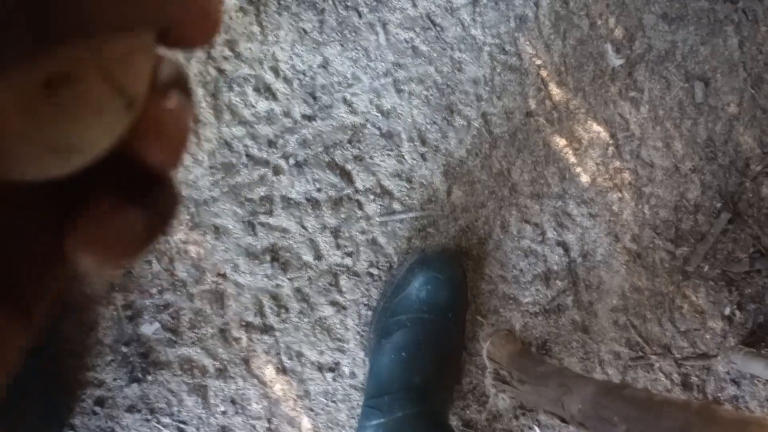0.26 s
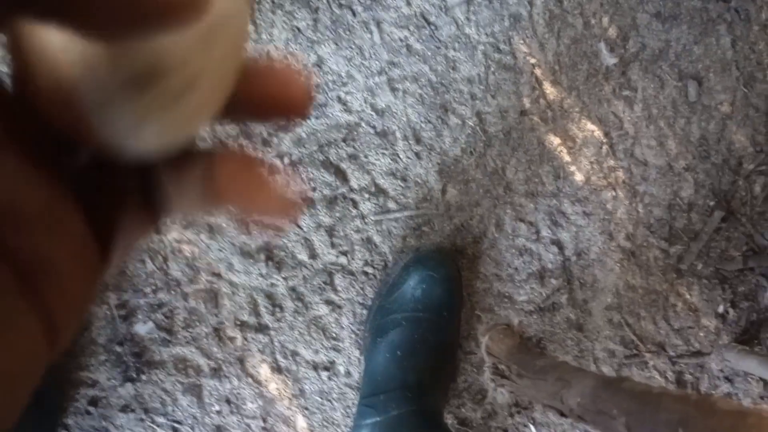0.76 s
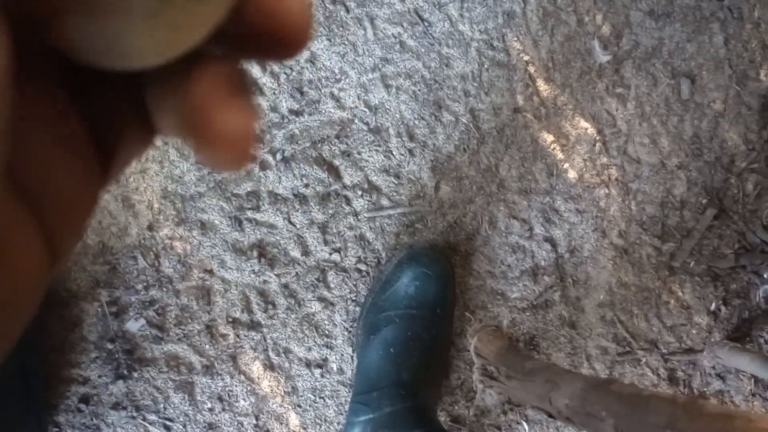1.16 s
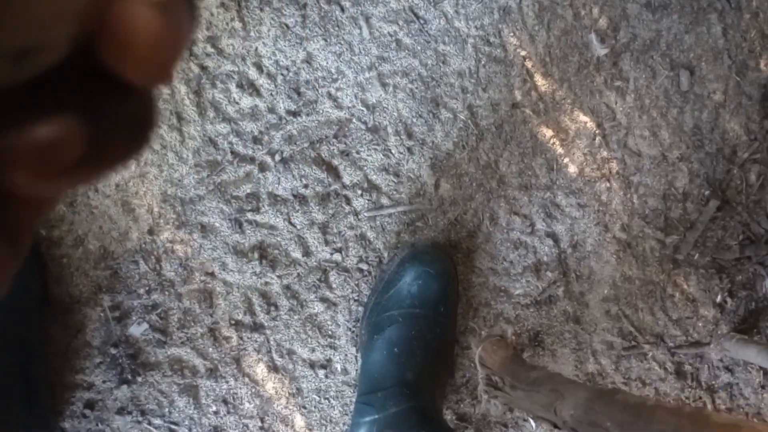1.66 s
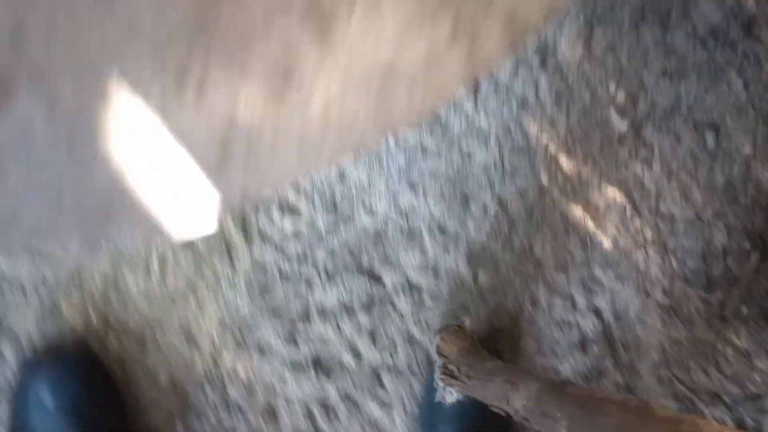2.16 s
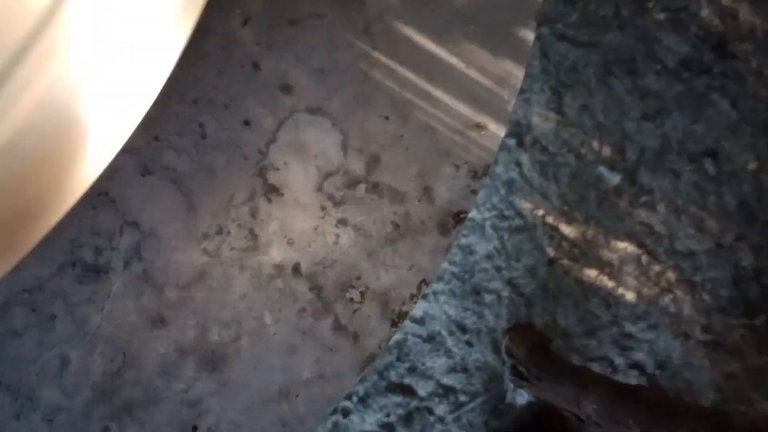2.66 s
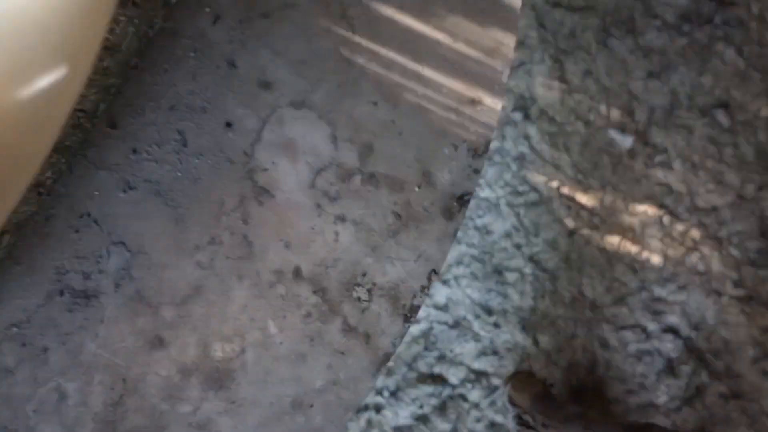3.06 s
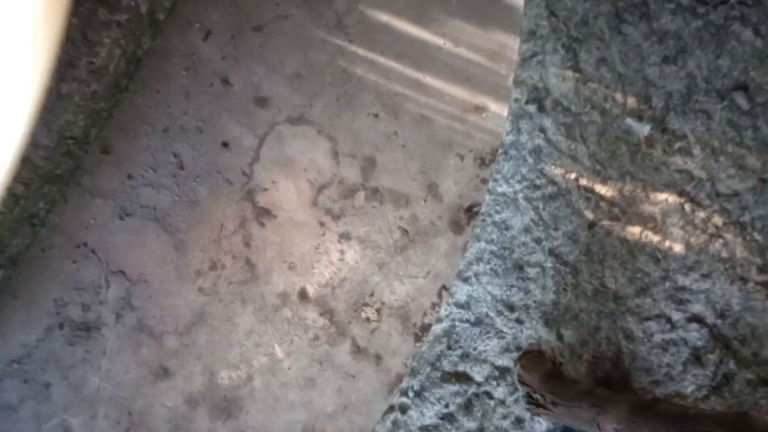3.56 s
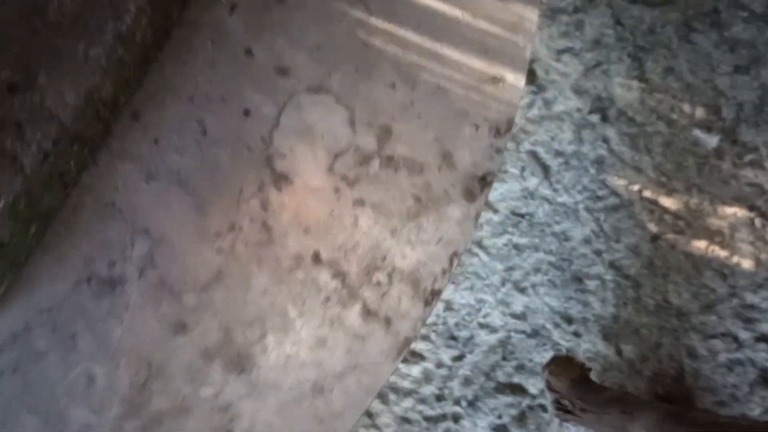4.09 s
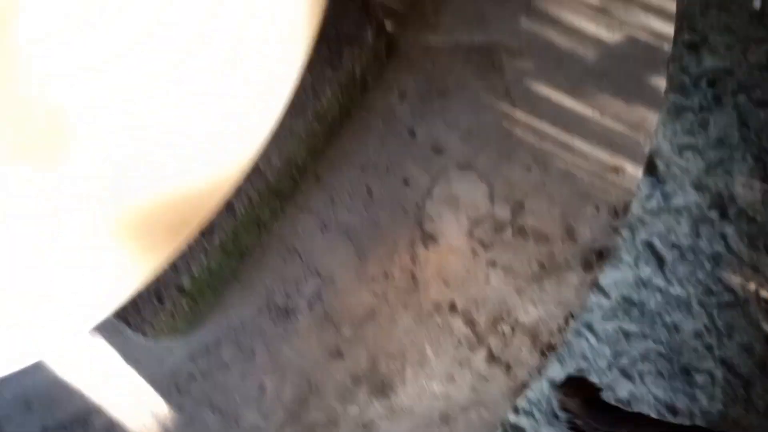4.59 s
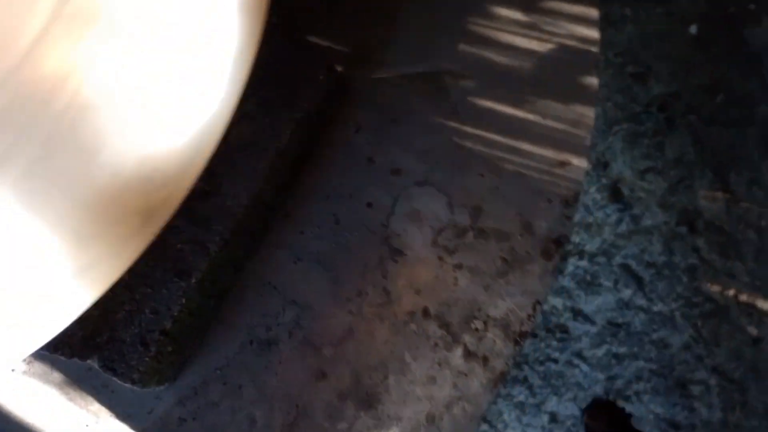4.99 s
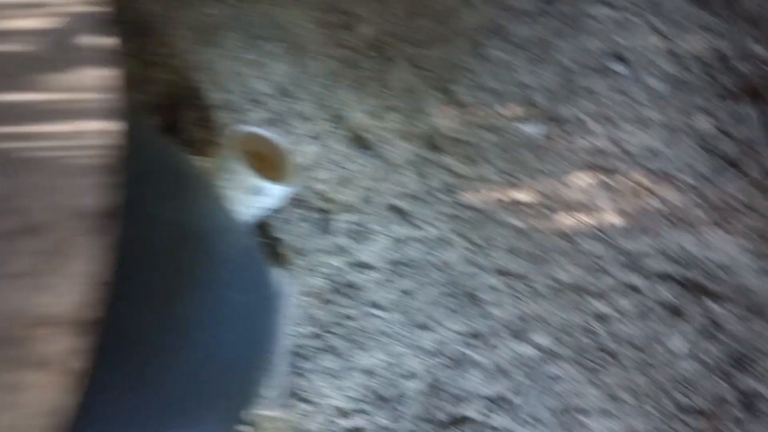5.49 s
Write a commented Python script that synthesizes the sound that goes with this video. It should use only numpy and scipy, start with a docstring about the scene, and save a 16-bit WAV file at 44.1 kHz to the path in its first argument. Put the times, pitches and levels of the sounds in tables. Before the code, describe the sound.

Close stereo phone capture with short echoes off shed walls. It starts almost silent, with soft whistles and distant clipped clucks. Midway a turkey gobbles once, loud and hoarse, its yelps tumbling rapidly over a low chest drumming. Straight afterwards guinea fowl answer in bright, nasal rasping notes, with a reedy churr and a purring rattle; fingers bump and rub the case, and a last harsh note is cut off.

```python
"""Poultry shed: a turkey gobbles once, close to a hand-held phone.
Turkey: yelps and cries of strong low harmonics, hoarse overtones, a drumming chest.
Guinea fowl: pulses and puffs through throat resonances, far then near; churrs, rattles, a squeal.
Hen: falling near-sine whistles. Hand: damped knocks, rubs and a cloth brush in shaped noise.
Yard: steady coloured noise. The walls return a short echo of all the birds."""
import sys
import numpy as np
from scipy import signal
from scipy.fft import rfft, irfft, next_fast_len
from scipy.io import wavfile

SR = 44100
rng = np.random.default_rng(int(sys.argv[2]) if len(sys.argv) > 2 else 0)


def to_wav(sig):
    """Store sig (one row per channel, or 1-D mono) as 16-bit WAV at the path in sys.argv[1].

    Samples outside -1..1 are clipped; the rate is SR.
    """
    pcm = np.clip(np.atleast_2d(sig), -1, 1) * 32767
    pcm = np.round(pcm).astype(np.int16)
    wavfile.write(sys.argv[1], SR, pcm.T)  # frames by channels


N = 253134

# gobble syllables: (start [s], hold [s], first harmonic [dB], second harmonic [dB], overtones [dB],
# start pitch [Hz], target pitch [Hz])
GOBBLE = [(2.708, 0.017, -33, -30.5, -31.5, 718, 728), (2.759, 0.02, -41, -42, -27, 742, 760),
          (2.921, 0.021, -51.5, -32, -31, 640, 596), (2.968, 0.0099, -26, -23, -24, 618, 669.4),
          (3.048, 0.026, -28.5, -33, -31, 609, 690.5), (3.119, 0.018, -34.5, -28.5, -29.5, 643, 690),
          (3.162, 0.012, -39, -37, -25, 697.5, 717), (3.172, 0.012, -31, -30.5, -33, 719, 628),
          (3.223, 0.032, -29.5, -32, -28.5, 599.6, 691), (3.277, 0.014, -49.5, -42, -26.5, 695.5, 723),
          (3.305, 0.0022, -45.5, -29, -32, 606, 589), (3.387, 0.036, -30, -33.5, -27, 713, 657)]
# two long opening cries: (time [s], pitch [Hz], first, second, third harmonic [dB], overtones [dB])
CRIES = [
    [(2.546, 699, -35.5, -42.5, -44.5, -35), (2.56, 617, -40, -16, -14, -45),
     (2.574, 708, -25, -14, -23.5, -29), (2.588, 700.5, -30, -14, -18.5, -33.5),
     (2.6, 591.4, -42, -21, -30, -32), (2.62, 655, -28.5, -13, -22.5, -35),
     (2.632, 737, -27, -16, -27, -29.5), (2.646, 800.4, -27, -19.5, -33, -23.5),
     (2.662, 696.5, -23.5, -23, -33, -19.5), (2.678, 777.4, -12, -41.5, -37, -36),
     (2.705, 728, -40.5, -40.5, -46.5, -41)],
    [(2.774, 630.4, -45.5, -35.5, -46, -30.5), (2.786, 651, -22, -14.5, -36.5, -33),
     (2.796, 604, -24, -27, -38, -32.5), (2.816, 643, -22, -21.5, -43, -34.5),
     (2.834, 723.5, -14.5, -28.5, -24, -20.5), (2.85, 793, -26, -20.5, -28, -25.5),
     (2.87, 768, -23, -31.5, -35.5, -27), (2.888, 672, -29.5, -28, -41, -37.5),
     (2.91, 666, -43, -40.5, -42.5, -39)],
]
# overtone envelope of the turkey: (frequency [Hz], relative level [dB])
BEAK = [(1800, 0), (2200, -4), (3000, -2), (4000, -5.5), (5200, -11.5), (7000, -21.5), (10000, -21.5),
        (15000, -35)]
# chest drumming under the gobble: (time [s], level [dB])
DRUM = [(2.53, -58.5), (2.596, -49.5), (2.638, -75), (2.774, -45.5), (2.902, -60.5), (2.936, -40.5),
        (2.988, -47.5), (3.454, -46.5), (3.53, -85.5)]
# chatter notes: (start [s], peak [dB], rise [s], hold [s], mouth opening [0-1])
CHATTER = [(.004, -59, 0.018, 0.063, 0.73), (0.444, -48, 0.0057, 0.013, 0.12),
           (0.72, -58, 0.028, 0.034, 0.27), (0.964, -57, 0.035, 0.049, 0.23),
           (1.253, -48.5, 0.021, 0.042, 0), (1.394, -53.5, 0.046, 0.031, 0.03),
           (1.746, -48, 0.031, 0.022, 0.76), (1.85, -41, 0.018, 0.007, 0.73),
           (1.956, -46, 0.018, 0.016, 0.66), (2.057, -45.5, 0.018, 0.014, 0.61),
           (2.161, -40, 0.012, 0.018, 0.5), (2.266, -42, 0.021, 0.015, 0.53),
           (2.36, -41.5, 0.017, 0.0047, 0.66), (2.443, -46, 0.033, 0.013, 0.63),
           (3.475, -33, 0.024, 0.0028, 0.93), (3.573, -33.5, 0.014, 0.024, 0.83),
           (3.679, -32.5, 0.0086, 0.027, 0.88), (3.795, -30, 0.032, 0.0056, 0.8),
           (3.964, -33, 0.029, 0.043, 0.87), (4.103, -26.5, 0.024, 0.038, 0.87),
           (4.224, -27, 0.015, 0.024, 0.85), (4.801, -29, 0.025, 0.026, 0.89),
           (4.939, -28, 0.024, 0.02, 0.93), (5.187, -28, 0.022, 0.045, 0.81),
           (5.584, -32, 0.034, 0.097, 0.84)]
# nominal throat resonances of the fowl: (centre [Hz], width [Hz], relative level [dB])
THROAT = [(963, 57, -7), (1424, 40, 8.5), (1828, 206, 1), (2259, 81, 6), (2766, 130, 4.5), (3372, 120, 6),
          (3980, 157, 7.5), (4357, 305, 2), (5350, 330, -9.5)]
# hiss spectrum of the fowl: (frequency [Hz], relative level [dB])
HISS = [(2940, -27), (5000, -0.5), (5600, 1.5), (7350, -7), (12600, -28.5), (15600, -84)]
# balance of the chatter as the phone turns: (time [s], left-right [dB])
BEARING = [(0, 0.5), (1.3, 3), (1.9, -8), (2.4, 0.5), (3.5, 0.5), (5.74, 0.5)]
# flock murmuring farther off: (time [s], level [dB])
FLOCK = [(1.4, -99), (2.4, -62), (3.5, -47.5), (3.93, -53.5), (4.8, -63.5), (5.1, -64), (5.5, -74.5),
         (5.74, -77.5)]
# throbbing rattles, one far and one near: (time [s], level [dB])
RATTLE = [
    [(1.45, -75), (1.7, -59.5), (1.76, -77)],
    [(4.17, -33), (4.45, -30), (4.66, -29), (4.73, -36), (4.79, -66)],
]
# rattle resonances: (centre [Hz], width [Hz], start level [dB], end level [dB], lag [throbs])
RATTLE_THROAT = [(906, 44, -8.5, -24.5, 0.36), (1623, 380, 3, 1.5, 0.0063), (2220, 170, -10, -0.5, 0.23),
                 (3170, 71, 7.5, -8, 0.028), (3630, 600, 14.5, -2.5, 0.043), (4540, 650, -6, -3, 0.29)]
# low voice of the near bird: (start [s], length [s], mid level [dB])
HUM = [(4.005, .05, -57), (4.12, .48, -52), (4.59, .16, -56), (4.82, .08, -57), (4.95, .1, -53),
       (5.205, .05, -55), (5.62, .2, -56)]
# reedy churrs of a second bird: (start [s], length [s], start pitch [Hz], end pitch [Hz],
# mid level [dB], overtones [dB], beading [0-1])
CHURR = [(0.023, 0.1, 2120, 2025, -55.5, -31, 1), (0.44, 0.054, 1390, 1270, -72, -16, 0.6),
         (1.012, 0.033, 1340, 1276, -65.5, -8, 0.6), (1.425, 0.13, 1338, 1304, -66.5, -3.5, 0.87),
         (1.538, 0.22, 1340, 1304, -61.5, -5, 1), (1.76, 0.28, 1292, 1350, -64.5, -3.5, 0.86),
         (3.566, 0.41, 1400, 1390, -46.5, -14, 0.1), (4.035, 0.079, 1388, 1312, -41, -2, 1),
         (4.314, 0.1, 1333, 1478, -33, -18.5, 0.5), (4.41, 0.32, 1424, 1486, -42, -5, 1),
         (5.068, 0.083, 1570, 1610, -55.5, -24, 0.55), (5.575, 0.12, 1348, 1395, -37, -22, 0.3)]
# hoarse squeal between the near notes: (time [s], centre [Hz], level [dB])
SQUEAL = [(3.52, 3650, -38.5), (3.6, 3323, -41.5), (3.78, 3167, -43.5), (3.88, 3425, -53),
          (3.97, 3273, -43), (4.0, 3400, -33)]
# falling whistles: (start [s], length [s], start pitch [Hz], end pitch [Hz], start level [dB])
WHISTLES = [(0, 0.49, 2260, 1538, -64), (0.569, 0.62, 2620, 1534, -62.5), (1.337, 0.3, 1880, 1260, -73.5)]
# ticks and bumps of the hand: (time [s], level [dB], centre [Hz], T60 [s])
TICKS = [(0.004, -66.5, 534, 0.49), (0.738, -58, 820, 0.098), (0.741, -64, 4860, 0.074),
         (2.844, -28, 287, 0.037), (3.018, -26.5, 366, 0.044), (3.892, -42.5, 285, 0.1),
         (4.496, -47, 536, 0.15), (5.313, -41, 328, 0.097), (5.344, -30, 318, 0.085),
         (5.368, -28.5, 353, 0.078), (5.427, -40, 114, 0.16), (5.43, -63, 1180, 0.096)]
# fingers rubbing along the case: (time [s], level [dB])
RUB = [
    [(2.25, -73.5), (2.52, -64.5), (2.53, -58)],
    [(5.2, -62), (5.31, -40.5), (5.375, -35.5), (5.405, -54.5), (5.52, -72.5)],
]
# rub spectrum: (frequency [Hz], relative level [dB])
RUB_TONE = [(30, -17.5), (140, -8.5), (248, -19.5), (327, -4), (571, -17), (1500, -18), (1950, -15),
            (3300, -120)]
# cloth brushing the phone: (time [s], level [dB])
BRUSH = [(.385, -79.5), (.44, -65), (.49, -78)]
# background spectrum: (frequency [Hz], relative level [dB])
YARD = [(25, -13.5), (116, -6), (1030, -25.5), (1310, -26), (1670, -21), (2490, -22.5), (15600, -36.5)]
# body shading between the two microphones: (frequency [Hz], left-right [dB])
PORT_DB = [(100, -1), (300, 2), (1400, 0), (2100, -7), (2750, -2), (3600, -10.5), (5200, -1), (6900, 4),
           (9500, 2), (15000, -9)]
# phase between the two microphones: (frequency [Hz], left lead [rad])
PORT_LEAD = [(300, .2), (700, .3), (1380, 1.3), (1750, 2.2), (2100, 4.6), (3000, 6), (15000, 30)]

YELP_ATTACK_S, YELP_T60_S = 0.011, 0.092
GLIDE_SHARE = 0.6  # time constant of the glide, as a share of the hold
SAG_HZ_PER_S = 1500  # pitch fall in the release
TRADE_DB = 2.5  # through a syllable the second harmonic yields this much to the first
DRUM_HZ = 79
NOTE_T60_S = 0.14
SCOOP = 0.13  # throat resonances start this share low and rise as the mouth opens
BRIGHTEN = 0.22  # loudest part of a note's spectrum rises by this share and falls back
THROBS_PER_S = 40.8
PULSE_HZ = 307  # mean rate of the fowl's pulses and hum
HUM_ENDS_DB, CHURR_ENDS_DB = -5, -18
WHISTLE_FADE_DB, WHISTLE_BEND = -24, 0.55
RING_HZ, RING_WIDTH_HZ, RING_DB = 1735, 45, 11  # a whistle swells as it passes this resonance
BRUSH_HZ = 5900
YARD_DB = -80.5
ECHO_FOWL_DB, ECHO_TOM_DB, ECHO_RATTLE_DB, SHED_T60_S = 2.5, -3.5, -2, 0.11
EDGE_HZ = 15720


def amp(db):
    """Decibels to amplitude."""
    return 10 ** (np.asarray(db) / 20)


def evened(x):
    """Scale to rms 1."""
    return x / np.sqrt(np.mean(x ** 2) + 1e-20)


def read(points, hz):
    """Interpolate a spectrum curve over log frequency."""
    f, value = np.transpose(points)
    return np.interp(np.log(hz + 1), np.log(f + 1), value)


def unroll(rows):
    """Times, soft-ended window and every column of a curve, sample by sample."""
    s, *columns = np.transpose(rows)
    t = np.arange(s[0], s[-1] + 0.0039, 1 / SR)
    edge = signal.windows.tukey(len(t), min(1, 0.0048 * SR / len(t)))
    return t, edge, [np.interp(t, s, c) for c in columns]


def add(mix, start_s, sound):
    """Add a sound in place, cut off at the end of the mix."""
    part = mix[..., round(start_s * SR):][..., :sound.shape[-1]]
    part += sound[..., :part.shape[-1]]


def phase(hz):
    """Phase [rad] of a frequency curve."""
    return 2 * np.pi * np.cumsum(hz) / SR


def colour(x, points):
    """Filter by a spectrum curve."""
    gain = amp(read(points, np.fft.rfftfreq(x.shape[-1], 1 / SR)))
    return irfft(rfft(x) * gain, x.shape[-1])


def resonate(x, hz, width_hz):
    """One-pole resonance, fixed or following a curve, run at baseband."""
    r = np.exp(-np.pi * width_hz / SR)
    turn = np.exp(2j * np.pi * np.cumsum(hz * np.ones(x.shape[-1])) / SR)
    return 2 * (turn * signal.lfilter([1 - r], [1, -r], x / turn)).real


def throat(drive, hz, width_hz):
    """Two resonances in series, the second twice as wide."""
    return resonate(resonate(drive, hz, width_hz), hz, 2 * width_hz)


def wander(count, width_hz):
    """Smooth random curve of rms 1: noise through two low-passes."""
    noise = rng.standard_normal(count + 999)
    return evened(resonate(resonate(noise, 0, width_hz), 0, width_hz)[999:])


def swell(start_s, length_s, db, ends_db):
    """Times, progress 0-1 and gain of a call that swells to db in its middle."""
    t, edge, (done,) = unroll([(start_s, 0), (start_s + length_s, 1)])
    soft = np.clip(np.minimum(t - start_s, start_s + length_s - t) / 0.02, 0, 1)
    return t, done, edge * soft * amp(db + ends_db * (2 * done - 1) ** 2)


def turkey():
    """Abrupt yelps: two harmonics trade places as the beak flaps, hoarse overtones, chest drumming."""
    out = np.zeros(N)
    n = 5000
    t = np.arange(n) / SR
    for start, hold, first_db, second_db, over_db, start_hz, target_hz in GOBBLE:
        done = 1 - np.exp(-t / (GLIDE_SHARE * hold))
        after = np.maximum(t - YELP_ATTACK_S - hold, 0)
        hz = start_hz + (target_hz - start_hz) * done - SAG_HZ_PER_S * after
        trade_db = TRADE_DB * (done - 0.5)
        shape = np.minimum(t / YELP_ATTACK_S, 1) ** 2 * amp(-60 * after / YELP_T60_S)
        turn = phase(hz * (1 + 0.015 * wander(n, 70) + 0.011 * wander(n, 500)))
        first_shake = amp(3.5 * np.minimum(wander(n, 160), 1))
        second_shake = amp(6 * np.minimum(wander(n, 160), 1))
        crack_rad = 0.9 * wander(n, 130)  # second harmonic breaks up
        first = amp(first_db + trade_db) * first_shake * np.cos(turn)
        second = amp(second_db - trade_db) * second_shake * np.cos(2 * turn + crack_rad)
        overtones = amp(over_db) * hoarse(hz, turn, lowest=3)
        add(out, start, shape * (np.sqrt(2) * (first + second) + overtones))
    t, edge, (drum_db,) = unroll(DRUM)
    drum = evened(throat(rng.standard_normal(len(t)), DRUM_HZ, 23))
    add(out, t[0], edge * amp(drum_db) * drum)
    return out


def cries():
    """Bending cries; each low harmonic swells on its own as the beak flaps."""
    out = np.zeros(N)
    for rows in CRIES:
        t, edge, (hz, *low_db, over_db) = unroll(rows)
        n = len(t)
        turn = phase(hz * (1 + 0.01 * wander(n, 70) + 0.014 * wander(n, 500)))
        low = np.zeros(n)
        for k, db in enumerate(low_db, 1):
            shake_db = 1.5 * k * np.minimum(wander(n, 160), 0.3)
            crack_rad = 0.3 * (k - 1) * wander(n, 130)
            low += amp(db + shake_db) * np.cos(k * turn + crack_rad)
        add(out, t[0], edge * (np.sqrt(2) * low + amp(over_db) * hoarse(hz, turn, lowest=4)))
    return out


def hoarse(hz, turn, lowest):
    """Upper harmonics, each flickering in level, and breath puffed once a cycle."""
    n = len(hz)
    stack = sum(amp(read(BEAK, k * hz) + 4.8 * wander(n, 59)) * np.cos(k * turn)
                for k in range(lowest, 12))
    breath = rng.standard_normal(n) * (1.65 + np.cos(turn))
    puffs = colour(breath, [(1100, -27.0)] + BEAK)
    return 0.9 * evened(stack) + 0.42 * evened(puffs)


def rasp():
    """Uneven pulses with a puff of air after each, and the hiss that they carry."""
    cycles = np.cumsum(PULSE_HZ * (1 + 0.07 * wander(N, 150))) / SR
    pulses = evened(np.diff(np.floor(cycles), prepend=0) * amp(0.6 * rng.standard_normal(N)))
    air = evened(rng.standard_normal(N) * np.exp(-(cycles % 1) / 0.5))
    return 0.7 * pulses + 0.62 * air, evened(colour(air + 0.62 * pulses, HISS))


def chatter():
    """Notes start narrow near 2.2 kHz and spread as the mouth opens; the throat is set anew each time."""
    drive, hiss = rasp()
    out = np.zeros((2, N))
    chance = rng.standard_normal((len(CHATTER), len(THROAT), 2))
    for (onset, db, rise, hold, mouth), setting in zip(CHATTER, chance):
        pan_db = np.interp(onset, *np.transpose(BEARING))
        peak_s, start = onset + rise, round(onset * SR)
        stop = min(round((peak_s + hold + NOTE_T60_S) * SR), N)
        t = np.arange(start, stop) / SR - peak_s
        span = slice(start, start + len(t))
        release_db = -60 * np.maximum(t - hold, 0) / NOTE_T60_S
        shape_db = np.where(t < 0, -11 * (t / rise) ** 4, release_db)
        opening = np.clip(mouth, 0, 1)
        shut = 1 - opening * np.clip(1 + t / rise, 0, 1)
        late_db = 40 * np.clip(-t / rise - 0.25, 0, 1)  # outer resonances join late
        slide = 1 - SCOOP * np.clip(0.5 - t / rise, 0, 1.5) + 0.015 * wander(len(t), 30)
        bright_hz = 2150 * (1 + BRIGHTEN * np.exp(-(t / hold - 0.5) ** 2))
        slope_db = 50 * shut ** 1.6 + late_db  # per octave away from bright_hz
        voice, full = np.zeros(len(t)), np.zeros(len(t))
        for (hz, width_hz, mode_db), (level_chance, pitch_chance) in zip(THROAT, setting):
            mode_hz = hz * (1 + 0.025 * pitch_chance) * slide
            mode = throat(drive[span], mode_hz, (0.65 + 1.2 * opening) * width_hz)
            mode = amp(mode_db + 1.5 * level_chance) * mode
            full += mode
            voice += mode * amp(-slope_db * abs(np.log2(hz / bright_hz)))
        voice = voice / np.std(full) + amp(-6.0 - 50.0 * shut - late_db) * hiss[span]
        flicker_db = 1.9 * wander(len(t), 41.4)
        pan = amp([[pan_db / 2], [-pan_db / 2]])
        add(out, start / SR, amp(db + shape_db + flicker_db) * voice * pan)
    add_flock(out)
    return out


def add_flock(out):
    """Distant murmur: noise through widened throat resonances, independent in each channel."""
    t, edge, (db,) = unroll(FLOCK)
    air = rng.standard_normal((2, len(t)))
    murmur = sum(amp(mode_db) * throat(air, hz, 1.9 * width_hz) for hz, width_hz, mode_db in THROAT)
    add(out, t[0], edge * amp(db) * evened(murmur))


def rattler():
    """Throbbing rasp, its resonances peaking at different lags in each throb; separate low hums."""
    drive, hiss = rasp()
    out = np.zeros(N)
    for rows in RATTLE:
        t, edge, (db,) = unroll(rows)
        n = len(t)
        slip = 0.06 * wander(n, 15)  # throbs come a little unevenly
        blur = np.linspace(0.1, 0.55, n) ** 1.5 + 0.1  # and blur into one another

        def beat(lag):
            """Throb envelope, delayed by a share of a throb."""
            throbs = THROBS_PER_S * (t - 4.312) + slip - lag
            return ((1 + np.cos(2 * np.pi * throbs)) / 2 + blur) ** 1.8

        voice = np.zeros(n)
        for hz, width_hz, from_db, to_db, lag in RATTLE_THROAT:
            mode_db = np.linspace(from_db, to_db, n) + 1.5 * wander(n, 23)
            mode_hz = hz * (1 + width_hz / 8000 * wander(n, 8))
            voice += amp(mode_db) * beat(lag) * evened(throat(drive[:n], mode_hz, width_hz))
        breath = amp(-21) * (1 + beat(0.29)) / 2 * hiss[:n]
        add(out, t[0], edge * amp(db) * (evened(voice) + breath))
    for row in HUM:
        t, _, gain = swell(*row, HUM_ENDS_DB)
        turn = phase(PULSE_HZ * (1 + 0.036 * wander(len(t), 39)))
        tone = np.sqrt(2) * (np.cos(turn) + 0.068 * np.cos(2 * turn))
        add(out, t[0], gain * amp(2.4 * wander(len(t), 87)) * tone)
    return out


def churr():
    """Reed tone with two overtones, beaded about eighty times a second."""
    out = np.zeros(N)
    for start, length, start_hz, end_hz, db, over_db, beading in CHURR:
        t, done, gain = swell(start, length, db, CHURR_ENDS_DB)
        n = len(t)
        hz = start_hz + (end_hz - start_hz) * done
        turn = phase(hz * (1 + 0.011 * beading * wander(n, 150)))
        beat = 1 + np.clip(beading, 0, 1) * np.cos(phase(80 * (1 + 0.3 * wander(n, 25))))
        tone = np.cos(turn) + amp(over_db) * (np.cos(2 * turn) + 1.56 * np.cos(3 * turn))
        add(out, t[0], gain * np.sqrt(2) * amp(2.0 * wander(n, 33)) * tone * beat)
    return out


def squeal():
    """Narrow tone, wavering in pitch and level."""
    t, edge, (hz, db) = unroll(SQUEAL)
    turn = phase(hz * (1 + 0.014 * wander(len(t), 90)))
    out = np.zeros(N)
    add(out, t[0], edge * amp(db + 2.6 * wander(len(t), 85)) * np.cos(turn))
    return out


def hen():
    """Near-sine whistles, unsteady in pitch and level, with a faint overtone."""
    out = np.zeros(N)
    for start, length, start_hz, end_hz, start_db in WHISTLES:
        t, edge, (done,) = unroll([(start, 0), (start + length, 1)])
        hz = start_hz * (end_hz / start_hz) ** done ** WHISTLE_BEND
        turn = phase(hz * (1 + 0.009 * wander(len(t), 120)))
        tone = np.cos(turn) + 0.027 * np.cos(2 * turn)
        ring_db = RING_DB * np.exp(-((hz - RING_HZ) / RING_WIDTH_HZ) ** 2)
        db = start_db + WHISTLE_FADE_DB * done + ring_db + 2.5 * wander(len(t), 50)
        add(out, t[0], edge * np.sqrt(2) * amp(db) * tone)
    return out


def hand():
    """Damped knocks, lumpy low rubs and a cloth brush, partly or wholly unlike at the two microphones."""
    out, t = np.zeros((2, N)), np.arange(6000) / SR
    for start, db, hz, t60 in TICKS:
        air = rng.standard_normal((3, len(t)))
        knock = evened(throat(air[2] + 0.37 * air[:2], hz, 0.52 * hz))
        add(out, start, amp(db - 60 * t / t60) * knock * (1 - np.exp(-t / 0.0022)))
    for rows in RUB:
        s, edge, (db,) = unroll(rows)
        air = rng.standard_normal((3, len(s)))
        rub = evened(colour(air[2] + 1.63 * air[:2], RUB_TONE))
        add(out, s[0], edge * amp(db + 1.5 * wander(len(s), 90)) * rub)
    s, edge, (db,) = unroll(BRUSH)
    brush = evened(throat(rng.standard_normal((2, len(s))), BRUSH_HZ, 2700))
    add(out, s[0], edge * amp(db) * brush)
    return out * amp([[0.7], [-0.7]])


def yard():
    """Steady coloured noise, partly shared between the channels."""
    air = rng.standard_normal((3, N))
    return amp(YARD_DB) * evened(colour(air[:2] + 0.85 * air[2], YARD))


def shed(x, t60_s):
    """Sparse decaying echoes of random sign, unlike in each channel; the bass stays direct."""
    taps = rng.choice([-1., 1.], (2, 12000)) * (rng.random((2, 12000)) < 0.05)
    taps[:, :60] = 0
    hz, t, z = signal.stft(taps, SR, nperseg=256)
    bass_cut = 1 + (550 / (hz[:, None] + 1)) ** 4
    tail = signal.istft(z * amp(-60 * t / t60_s) / bass_cut, SR, nperseg=256)[1]
    return signal.fftconvolve(x, tail / np.linalg.norm(tail[0]), axes=1)[:, :N]


def ports(x):
    """The two microphones differ in level and phase, split evenly between the sides."""
    size = next_fast_len(N + 2048)
    hz, side = np.fft.rfftfreq(size, 1 / SR), np.array([[0.5], [-0.5]])
    response = amp(side * read(PORT_DB, hz)) * np.exp(1j * side * read(PORT_LEAD, hz))
    return irfft(rfft(x, size) * response, size)[:, :N]


def scene():
    """Birds and their echo through the ports; hand and yard added directly."""
    rattle = rattler()
    tom = (turkey() + cries()) * np.ones((2, 1))
    fowl = chatter() + churr() + squeal() + hen()
    background = yard()
    send = amp(ECHO_FOWL_DB) * fowl + amp(ECHO_TOM_DB) * tom + amp(ECHO_RATTLE_DB) * rattle
    return ports(fowl + tom + rattle + shed(send, SHED_T60_S)) + hand() + background


def record(dry):
    """The microphone drops the deepest bass; then the band limit."""
    cut = signal.lfilter(*signal.butter(4, 56, "high", fs=SR), dry)
    band = signal.firwin(1023, EDGE_HZ, window=("kaiser", 9), fs=SR)
    return signal.oaconvolve(cut, band[None], "same", axes=1)


dry = scene()
out = record(dry)
to_wav(out)
```